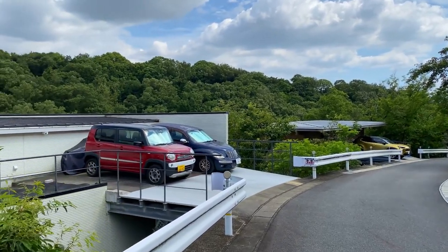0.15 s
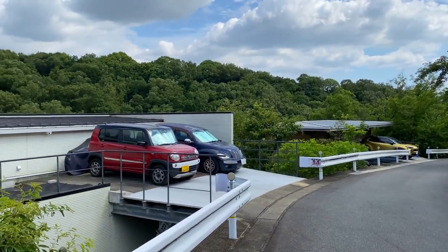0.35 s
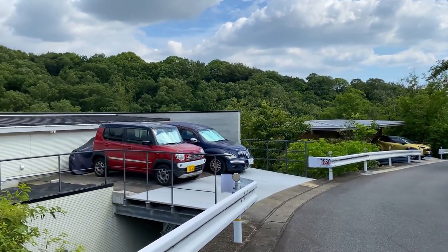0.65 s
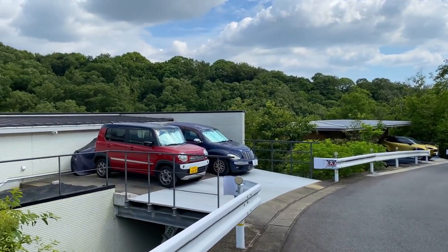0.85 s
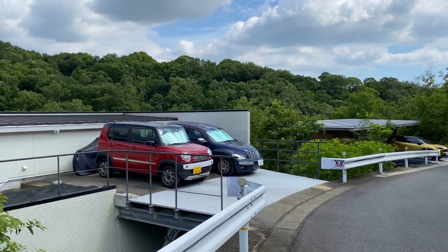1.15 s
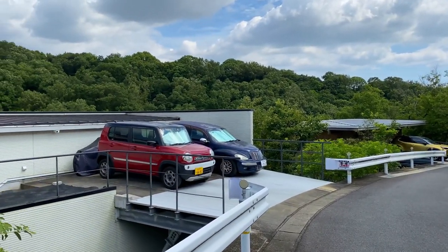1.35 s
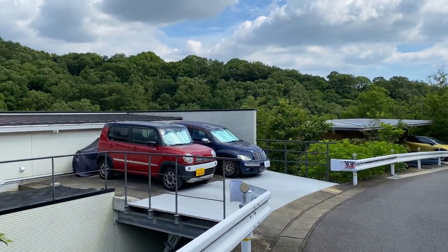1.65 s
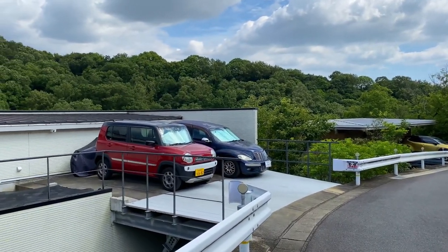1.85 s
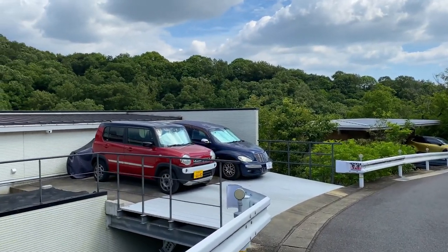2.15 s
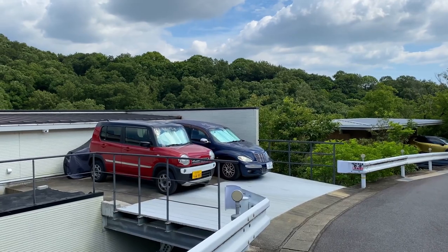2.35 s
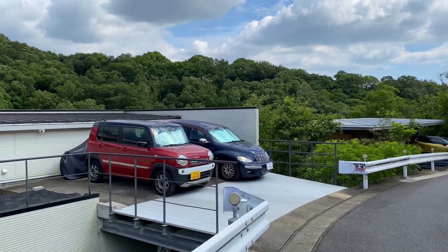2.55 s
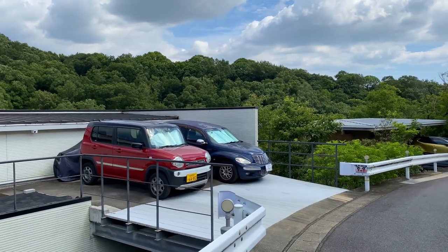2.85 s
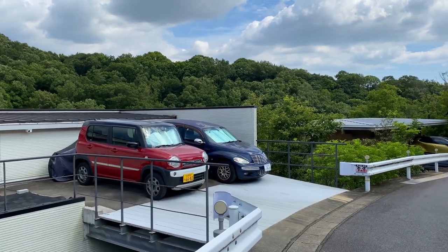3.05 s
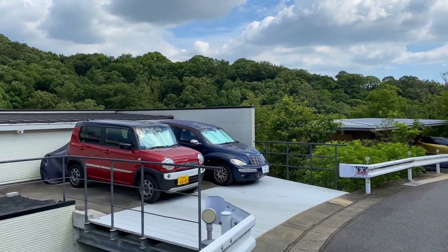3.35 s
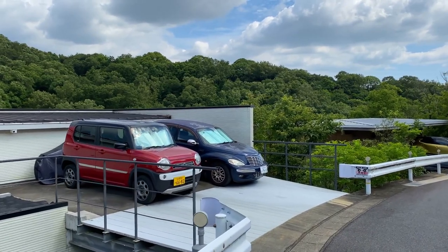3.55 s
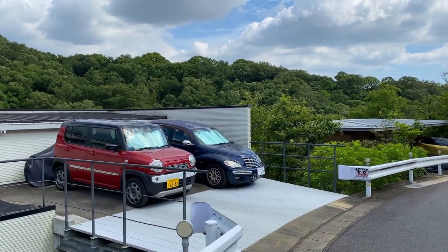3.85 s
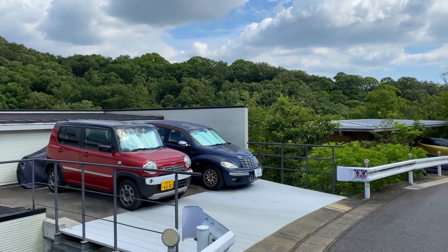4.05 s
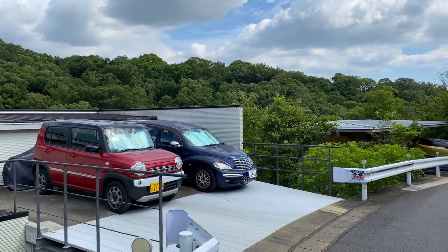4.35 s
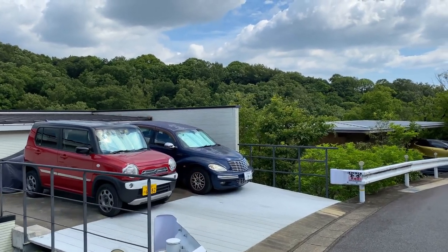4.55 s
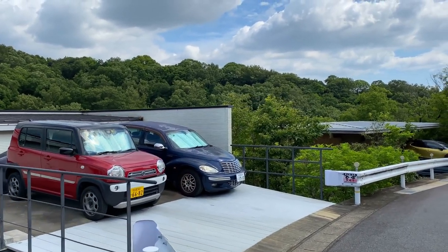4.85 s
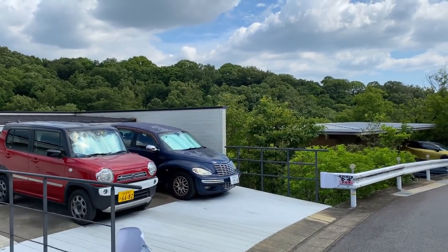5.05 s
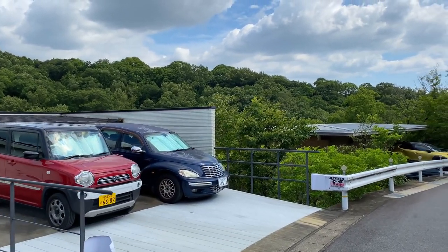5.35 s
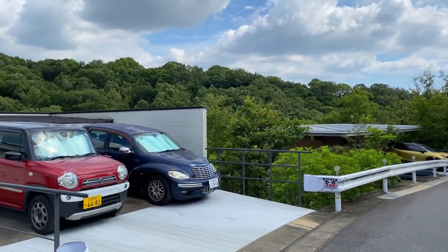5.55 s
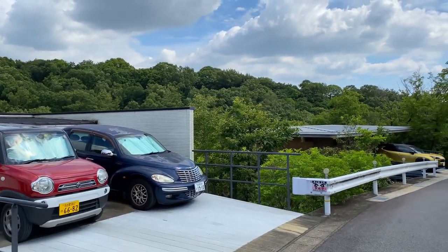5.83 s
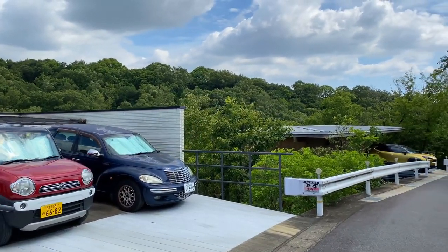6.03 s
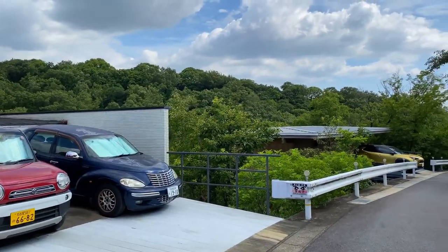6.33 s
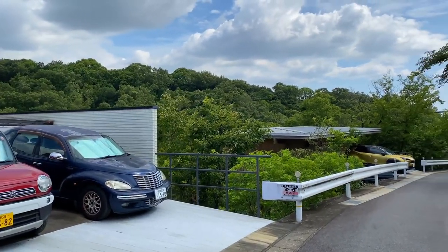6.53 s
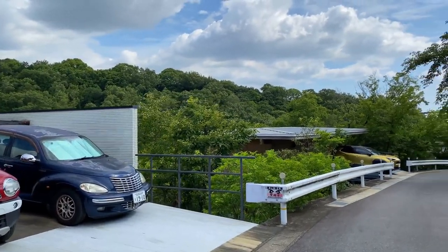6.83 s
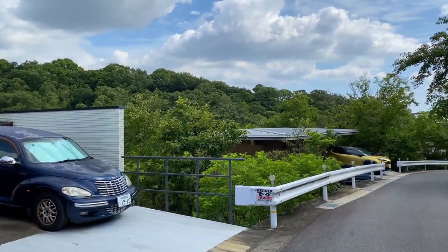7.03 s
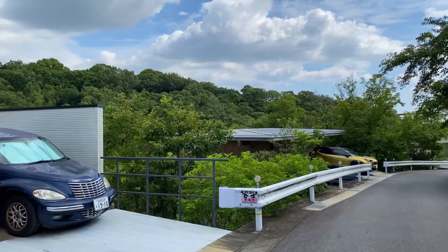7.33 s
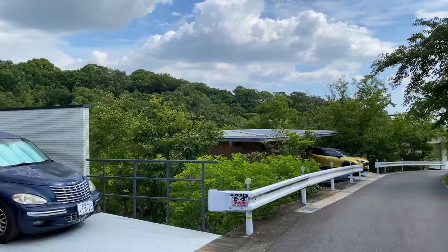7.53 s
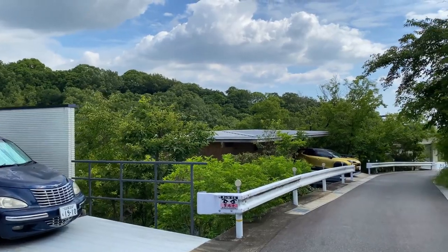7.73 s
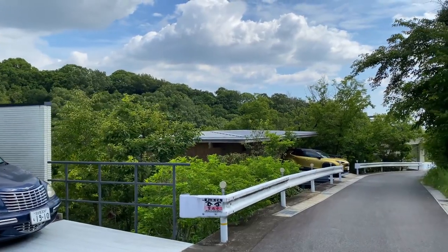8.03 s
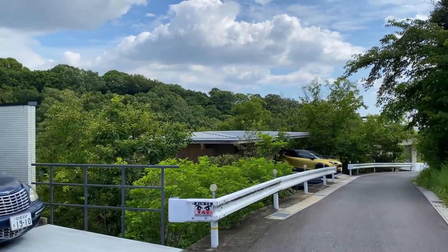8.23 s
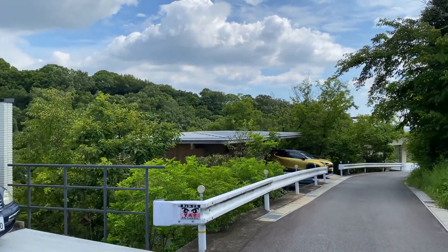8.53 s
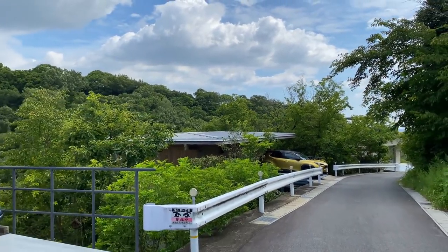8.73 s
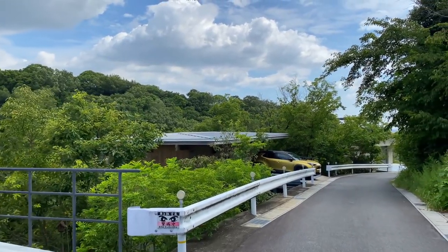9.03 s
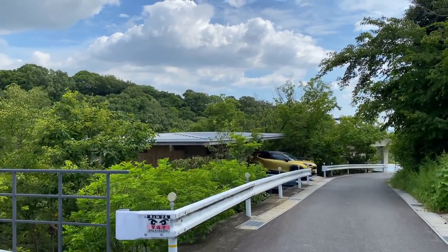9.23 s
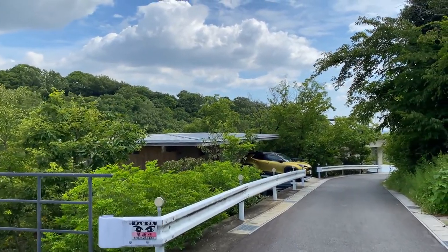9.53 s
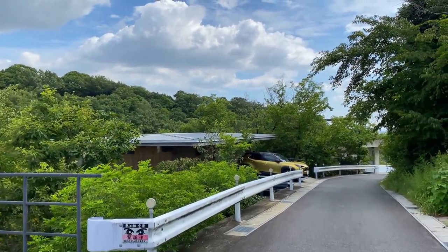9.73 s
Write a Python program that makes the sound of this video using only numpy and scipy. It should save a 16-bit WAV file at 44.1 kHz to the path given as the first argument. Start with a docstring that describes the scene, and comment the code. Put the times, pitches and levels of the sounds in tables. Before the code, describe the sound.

A dense, high cicada chorus sounds from start to finish, about ten seconds, and dominates everything. Distant insects merge into a sizzle, while nearer ones rattle with a fast throb that deepens around 1, 4 to 7 and 9 seconds. A lower, rasping cicada and two faint, thin whines run within it. Underneath are a faint town murmur and light, low puffs of air on the microphone. Soft footsteps on asphalt begin at about 1.2 seconds and continue at a stroll, one roughly every 0.6 seconds, each a dull thud with a gritty scuff. One faint, distant bird chirp falls in pitch at 1.3 seconds. A higher shrill swells from 5 seconds, peaks just after 6 and fades before 8. The chorus grows somewhat louder from 7 seconds, and at 9.2 seconds a hand gives the microphone one soft, low knock.

```python
"""A stroll down a quiet paved lane below a wooded hillside of cicadas. From the start, hundreds of far
insects merge into a sizzle, nearer ones rattle their tymbals and throb about 16 times a second, and two
thin whines ride on top; a town murmurs and air buffets the microphone. Soft footsteps begin at 1.2 s,
and one far bird chirps just after. A high shrill swells and fades around 6 s. The chorus grows louder
as the trees come closer, and at 9.2 s the hand knocks the microphone once."""
import sys
import numpy as np
from scipy import signal
from scipy.fft import rfft, irfft
from scipy.io import wavfile

SR = 44100
rng = np.random.default_rng(int(sys.argv[2]) if len(sys.argv) > 2 else 0)


def materialize(psi):
    """Save the field psi as 16-bit PCM at rate SR to the path in sys.argv[1].

    A 1-D psi becomes a single channel; in a 2-D psi each row is a channel.
    """
    bounded = np.clip(np.atleast_2d(psi).T, -1, 1)
    quanta = np.round(bounded * 32767).astype(np.int16)
    wavfile.write(sys.argv[1], SR, quanta)


N = 435708
TIME = np.arange(N) / SR
FREQS = np.maximum(np.arange(N // 2 + 1) * SR / N, 1)

# Bouts in which the nearest cicada pumps harder: middle_s, length_s, added_depth
PUMPING_BOUTS = [(.85, 1.1, .45), (4.15, .8, .65), (5.5, 1.5, 0.7), (6.8, 1.1, .35), (9.0, .7, 0.53)]
# The chorus's two resonances and top sizzle as the trees come closer: time_s, lower_db, upper_db, sizzle_db
CHORUS_LEVELS = [(0, -45, -47.5, -53), (1.2, -46, -47, -51.5), (3.5, -46, -47.5, -50),
                 (4.2, -45.5, -46.5, -50), (5.2, -45.4, -46.7, -49), (6.5, -45.5, -46, -48.5),
                 (7.4, -44, -46, -47.5), (9.88, -42.5, -46, -45.5)]
# Body resonances of the chorus: frequency_hz, relative_db
BODY_SPECTRUM = [(2400, -49), (3500, -27.5), (4000, -25.5), (4650, -13.5), (5130, 0.5), (5900, 2),
                 (6400, 0), (7000, -4.5), (7700, -3.5), (8500, -2.5), (9000, -7), (9800, -18.5),
                 (10500, -22), (13000, -37)]
# Sizzle above those resonances: frequency_hz, relative_db
SIZZLE_SPECTRUM = [(8000, -33.5), (10000, -20.5), (11000, -10), (12100, -2.5), (13000, -3), (14300, 3.5),
                   (15800, 0)]
# Body resonance of a larger, deeper cicada: frequency_hz, relative_db
DEEP_BODY_SPECTRUM = [(2800, -40), (3700, -20), (4200, -7.5), (4700, -1.5), (5100, -2.5), (6200, -27)]
# Its strongest surges: middle_s, rise_db
DEEP_CICADA_SURGES = [(1.53, 4.5), (5.56, 4), (7.1, 4), (8.38, 4), (9.8, 4)]
# Fundamentals of the two whining cicadas: time_s, pitch_hz, level_db
LOW_WHINE_TRACK = [(0, 2670, -84), (1.5, 2710, -79), (2.5, 2713, -73), (3.5, 2796, -81), (4.5, 2747, -75.5),
                   (8.2, 2765, -72), (9.88, 2826, -74)]
HIGH_WHINE_TRACK = [(0, 2950, -83), (3, 3040, -79), (4, 2988, -73), (5.5, 2990, -73), (8.3, 2980, -76.5),
                    (9.88, 3005, -68)]
# Murmur of the town: frequency_hz, relative_db
TOWN_SPECTRUM = [(65, -19), (110, -8), (161, -0.5), (319, -5.5), (1060, -8.5), (1890, -14), (2220, -11),
                 (2730, -3.5), (3070, -8.5), (3200, -10), (3600, -16.5), (4680, -56), (7920, -120)]
# Swells of a faint low hum: middle_s, length_s, peak_db
HUM_SWELLS = [(0.385, .55, -72), (3.02, .7, -71.5)]
# Buffeting of air on the microphone: frequency_hz, relative_db
BUFFET_SPECTRUM = [(3, -3.5), (7, 4), (15, -7), (21, -35), (32, -23.5), (60, -42), (120, -49.5), (300, -75),
                   (900, -92)]
# Stronger puffs of air: middle_s, length_s, peak_db
AIR_PUFFS = [(0.056, .5, -54.5), (.73, 0.44, -54.5), (1.087, 0.75, -57.5), (2.55, 0.57, -60.5),
             (3.23, 0.29, -58.5), (5.47, 0.1, -58), (6.8, 0.37, -59), (9.2, 0.41, -58.5),
             (9.8, 0.34, -63.5)]
# Shoes on asphalt: start_s, heel_relative_db, sole_relative_db
FOOTFALLS = [(1.219, -62, -77), (1.799, -64, -80), (2.41, -59, -74), (2.999, -68, -69), (3.649, -66, -75),
             (4.339, -63, -75), (4.941, -58, -68), (5.449, -65, -66), (6.056, -66, -68), (6.68, -65, -75),
             (7.298, -66, -70), (7.899, -69, -66), (8.489, -64, -62), (9.217, -62, -66)]


def from_db(db):
    """Amplitude grows tenfold every 20 dB."""
    return 10 ** (np.asarray(db) / 20)


def rms_one(x):
    """Normalisation to unit rms."""
    return x / np.sqrt(np.mean(x ** 2) + 1e-20)


def in_time(rows):
    """Linear interpolation of each column at every sample."""
    time_s, *columns = np.transpose(rows)
    return [np.interp(TIME, time_s, column) for column in columns]


def noise():
    """White Gaussian noise."""
    return rng.standard_normal(N)


def drift(rate_hz):
    """Random fluctuation: low-passed noise of unit rms."""
    return rms_one(irfft(rfft(noise()) / (1 + (FREQS / rate_hz) ** 2), N))


def coloured(x, spectrum):
    """Spectral shaping, scaled to unit rms."""
    hz, db = np.transpose(spectrum)
    gain = from_db(np.interp(np.log(FREQS), np.log(hz), db))
    return rms_one(irfft(rfft(x) * gain, N))


def band(x, low_hz, high_hz, order=2):
    """Causal band-pass filtering."""
    return signal.sosfilt(signal.butter(order, [low_hz, high_hz], "band", fs=SR, output="sos"), x)


def swell(middle_s, length_s):
    """Raised-cosine envelope with peak 1."""
    return .5 + .5 * np.cos(2 * np.pi * np.clip((TIME - middle_s) / length_s, -.5, .5))


def burst(start_s, rise_s, fall_s):
    """Exponential attack and decay with peak 1."""
    age = np.maximum(TIME - start_s, 0)
    shape = (1 - np.exp(-age / rise_s)) * np.exp(-age / fall_s)
    return shape / (shape.max() + 1e-12)


def foliage(clicks, scatter_s, positions=10):
    """Scattering: leaves and walls spread each click into echoes that change as the listener walks."""
    age = TIME[:SR // 30]
    out, stride = np.zeros(N), N / (positions - 1)
    for k in range(positions):
        echoes = rng.standard_normal(len(age)) * np.exp(-age / scatter_s)
        part = np.arange(max(0, int((k - 1) * stride)), min(N, int((k + 1) * stride)))
        crossfade = np.cos(np.pi / 2 * (part / stride - k))
        out[part] += crossfade * signal.fftconvolve(clicks[part], echoes)[:len(part)]
    return out


def cicada(throb_hz, depth, tymbal_hz, jitter=.013, wander=.008, second_gain=.48, scatter_s=.015):
    """Buckling: two tymbals click in turn, and the pumping abdomen modulates the power of the train."""
    cycles = np.cumsum(tymbal_hz * (1 + jitter * drift(60) + wander * drift(.99))) / SR
    left, right = (np.diff(np.floor(cycles + lag), prepend=0) for lag in (0, .5))
    clicks = (left + second_gain * right) * from_db(2 * noise())
    phase = 2 * np.pi * np.cumsum(throb_hz) / SR
    power = 1 + depth * (np.cos(phase) + .44 * np.cos(2 * phase))  # the harmonic sharpens each throb
    return rms_one(foliage(clicks, scatter_s) * np.sqrt(np.maximum(power, .02)))


def nearest_cicada(resting_depth=.25):
    """Amplitude modulation keeps an even beat and deepens in each bout of pumping."""
    depth = resting_depth + sum(added * swell(s, length) for s, length, added in PUMPING_BOUTS)
    throb_hz = 16 + .3 * drift(.83)
    return cicada(throb_hz, np.clip(depth, 0, 1), tymbal_hz=199.1, jitter=.009, wander=.003, second_gain=.28)


def chorus(split_hz=6900):
    """Source and filter: near click trains and the far insects' merged noise share body resonances."""
    lower_db, upper_db, sizzle_db = in_time(CHORUS_LEVELS)
    nearest = nearest_cicada()
    neighbours = np.zeros(N)
    for _ in range(3):
        throb_hz = rng.uniform(13, 20) + 1.25 * drift(1)
        neighbours += cicada(throb_hz, depth=.35, tymbal_hz=rng.uniform(182, 214))
    hillside = noise() + from_db(.5) * rms_one(neighbours)
    low_pass = 1 / (1 + (FREQS / split_hz) ** 24)
    lower = coloured(hillside + nearest, BODY_SPECTRUM)
    lower = rms_one(irfft(rfft(lower) * low_pass, N))
    upper = coloured(hillside + from_db(-11.5) * nearest, BODY_SPECTRUM)
    upper = rms_one(irfft(rfft(upper) * (1 - low_pass), N))
    sizzle = coloured(hillside + from_db(-1) * nearest, SIZZLE_SPECTRUM)
    return from_db(lower_db) * lower + from_db(upper_db) * upper + from_db(sizzle_db) * sizzle


def deep_cicada(start_db=-62.5, approach_db_per_s=.74, flutter_db=2, surge_s=.14):
    """A larger body resonates lower; its irregular clicks rasp, louder as the walker draws near."""
    throb_hz = 15.5 + drift(.82)
    rasp = cicada(throb_hz, depth=.53, tymbal_hz=188, jitter=.12, wander=.04, scatter_s=.026)
    surges_db = sum(rise_db * swell(s, surge_s) for s, rise_db in DEEP_CICADA_SURGES)
    level_db = start_db + approach_db_per_s * TIME + flutter_db * drift(7.3) + surges_db
    return from_db(level_db) * coloured(rasp + noise(), DEEP_BODY_SPECTRUM)


def whine(track, width_hz, octave_db, waver_hz=6, octave_width_hz=12):
    """Spectral broadening: the woods smear a far cicada's thin tone, which is strongest at its octave."""
    pitch_hz, level_db = in_time(track)
    phase = 2 * np.pi * np.cumsum(pitch_hz + waver_hz * drift(2.985)) / SR
    fundamental = drift(width_hz) * np.cos(phase) + drift(width_hz) * np.sin(phase)
    octave = drift(octave_width_hz) * np.cos(2 * phase) + drift(octave_width_hz) * np.sin(2 * phase)
    return from_db(level_db) * (fundamental + from_db(octave_db) * octave)


def town(murmur_db=-66, hum_hz=215, waver_hz=6):
    """Superposition of a steady broadband murmur and a wavering hum that swells twice."""
    phase = 2 * np.pi * np.cumsum(hum_hz + waver_hz * drift(21)) / SR
    swells = sum(from_db(db) * swell(s, length) for s, length, db in HUM_SWELLS)
    return from_db(murmur_db) * coloured(noise(), TOWN_SPECTRUM) + swells * rms_one(np.sin(phase))


def town_rumble(level_db=-81, flutter_db=3.5):
    """Narrow-band noise, randomly modulated, is heard as a fluttering rumble far down in the town."""
    return from_db(level_db + flutter_db * drift(7.2)) * rms_one(band(noise(), 148.5, 194))


def breeze(draught_db=-60.5, sway_db=-69.5, sway_lag_s=.12, sway_s=.45, flutter_db=1.5):
    """Turbulence buffets the microphone in a draught, in the sway after each step and in puffs."""
    sway = from_db(sway_db) * sum(swell(s + sway_lag_s, sway_s) for s, _, _ in FOOTFALLS)
    puffs = sum(from_db(db) * swell(s, length) for s, length, db in AIR_PUFFS)
    flow = (from_db(draught_db) + sway + puffs) * from_db(flutter_db * drift(7.6))
    pressure = coloured(noise(), BUFFET_SPECTRUM)
    pressure /= np.std(band(pressure, 20, 90, order=4))  # mostly infrasound: levels count the audible part
    return flow * pressure * signal.windows.tukey(N, .006)


def footsteps(heel_gain_db=-3.5, sole_gain_db=-1):
    """Impact and friction: the heel lands with a dull thud and the sole scuffs on grit."""
    heel = sum(from_db(db) * burst(s, rise_s=.0045, fall_s=.016) for s, db, _ in FOOTFALLS)
    sole = sum(from_db(db) * burst(s, rise_s=.0032, fall_s=.018) for s, _, db in FOOTFALLS)
    grit = rms_one(band(noise() * from_db(2.8 * drift(300)), 500, 2200))
    thud = rms_one(band(noise(), 150, 530))
    return from_db(heel_gain_db) * heel * thud + from_db(sole_gain_db) * sole * grit


def chirp(start_s=1.335, glide_s=.03, level_db=-71, start_hz=3450, end_hz=3020, blur_hz=45):
    """Frequency modulation: one bird note glides down, blurred by the trees."""
    pitch_hz = np.interp(TIME, [start_s, start_s + glide_s], [start_hz, end_hz]) + blur_hz * drift(150)
    tone = rms_one(np.sin(2 * np.pi * np.cumsum(pitch_hz) / SR))
    return from_db(level_db) * burst(start_s, rise_s=.032, fall_s=.044) * tone


def shrill_cicada(level_db=-52, low_hz=8210, high_hz=8630):
    """Level follows distance: a narrow, high rattle swells and fades as the walker passes its tree."""
    rattle = cicada(throb_hz=16 + drift(1), depth=.25, tymbal_hz=206, jitter=.04)
    return from_db(level_db) * swell(middle_s=6.3, length_s=3.1) * rms_one(band(rattle, low_hz, high_hz))


def handling_bump(level_db=-57, lower_hz=95, upper_hz=158):
    """Damped vibration: a soft knock through the hand on the microphone rings in two low modes."""
    ring = from_db(-3) * np.sin(2 * np.pi * lower_hz * TIME) + np.sin(2 * np.pi * upper_hz * TIME)
    return from_db(level_db) * burst(9.215, rise_s=.0089, fall_s=.023) * ring


def scene():
    """Superposition: all sources add and reach both channels alike."""
    whines = whine(LOW_WHINE_TRACK, width_hz=27, octave_db=8)
    whines += whine(HIGH_WHINE_TRACK, width_hz=34, octave_db=14.5)
    cicadas = chorus() + deep_cicada() + shrill_cicada() + whines
    mono = cicadas + footsteps() + handling_bump() + chirp() + town() + town_rumble() + breeze()
    return np.stack([mono, mono])


def record(dry):
    """Band limiting: a steep low-pass filter removes the highest treble."""
    cutoff_hz = 15720
    return signal.sosfilt(signal.ellip(16, .1, 70, cutoff_hz, fs=SR, output="sos"), dry)


dry = scene()
out = record(dry)
materialize(out)
```